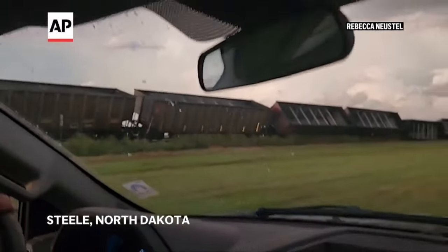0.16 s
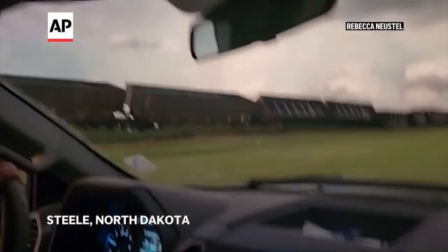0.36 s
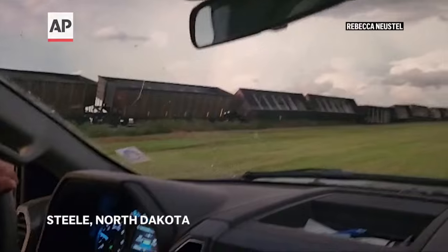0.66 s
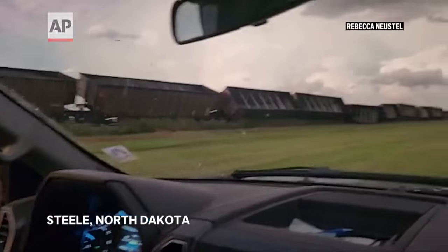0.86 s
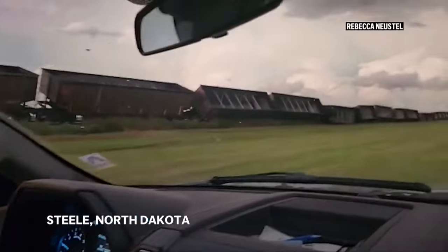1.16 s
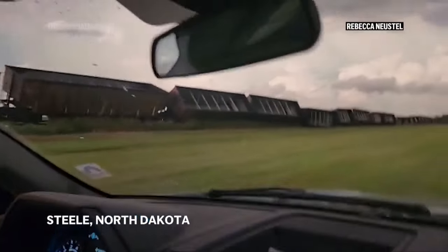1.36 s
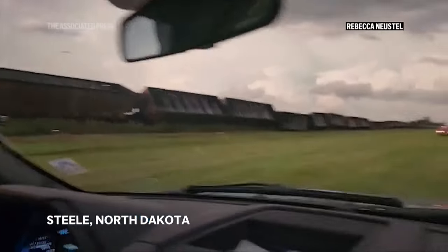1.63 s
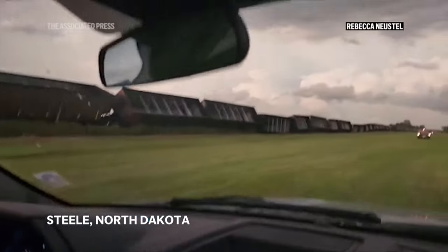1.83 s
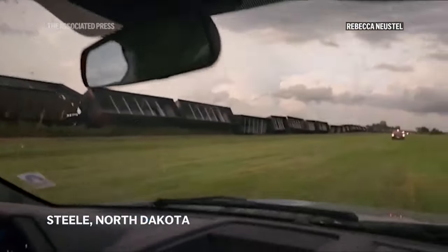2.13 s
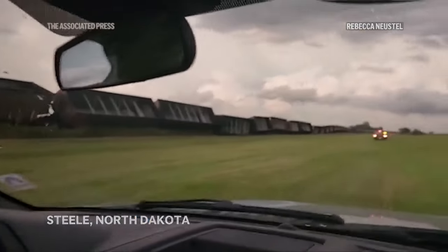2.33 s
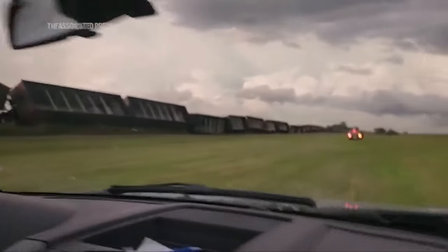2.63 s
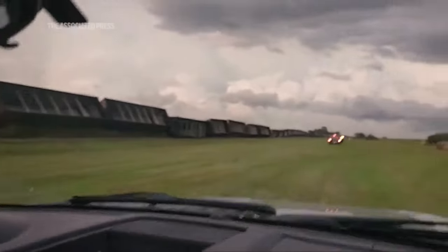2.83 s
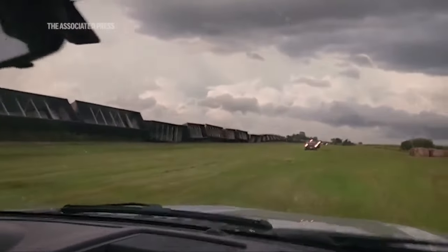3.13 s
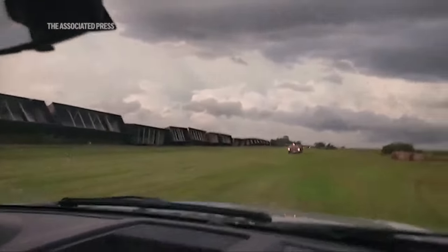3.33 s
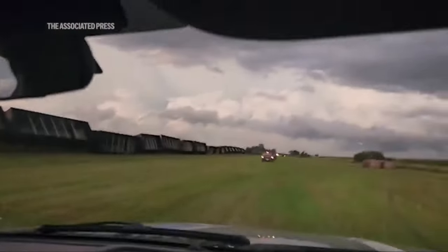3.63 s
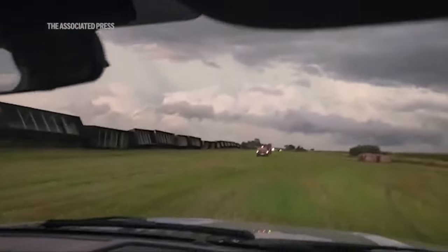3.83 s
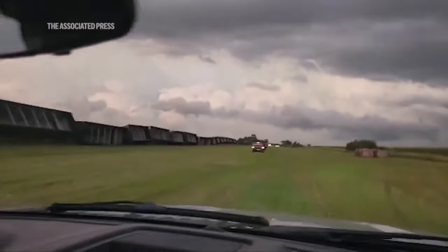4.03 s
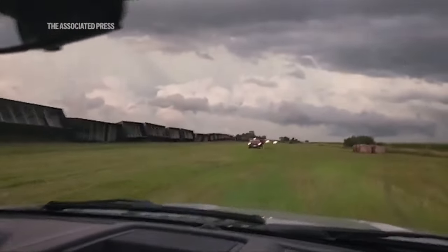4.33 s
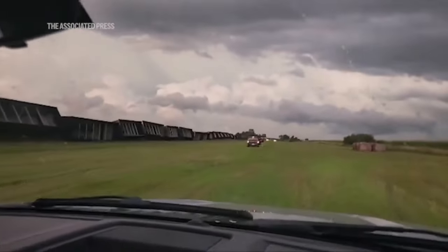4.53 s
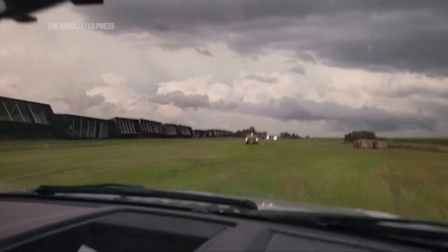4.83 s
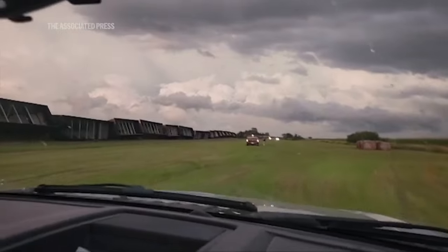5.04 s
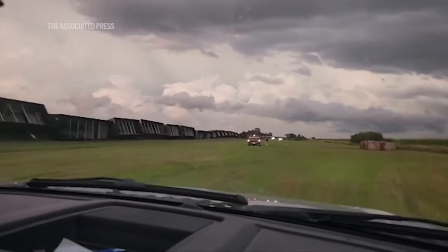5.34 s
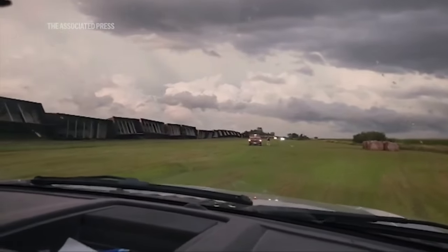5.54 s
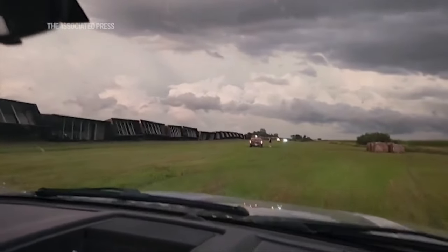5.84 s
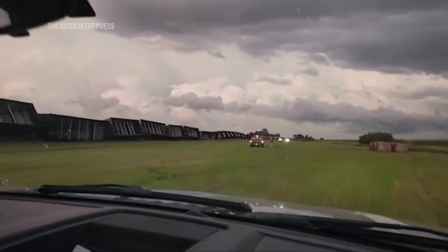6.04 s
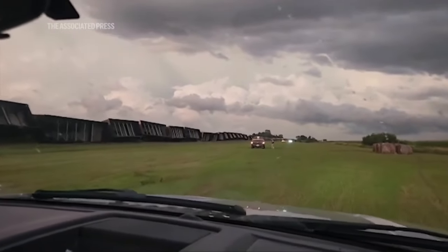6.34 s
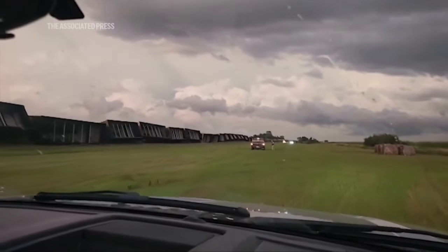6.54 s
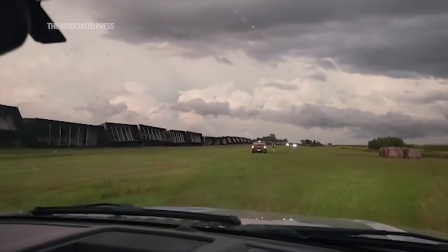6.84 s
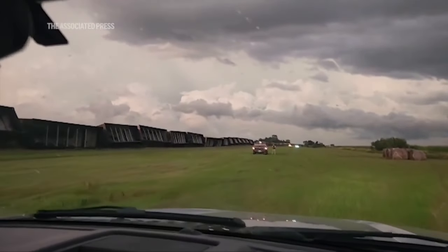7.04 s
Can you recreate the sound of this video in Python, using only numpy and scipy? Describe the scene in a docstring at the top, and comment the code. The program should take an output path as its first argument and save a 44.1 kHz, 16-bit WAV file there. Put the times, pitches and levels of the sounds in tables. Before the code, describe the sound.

Low V8 hum and shuddering rumble heard from the passenger seat, with muffled bumps, rattly clicks, brief creaks and faint grass hiss.

```python
"""Inside the cab of an eight-cylinder pickup that drives at a steady pace over a rough grass field.
The exhaust drones as a sum of cycle orders; shaped noise gives the ground rumble, tyre roar and grass hiss.
Jolts make the body shudder and the dashboard bump, clack and creak, as struck or juddering resonances.
A hand-held phone ticks in its case and slides over cloth, around most bumps, in strokes of clumped noise."""
import sys
import numpy as np
from scipy import signal
from scipy.fft import rfft, irfft, next_fast_len
from scipy.io import wavfile
from scipy.ndimage import uniform_filter1d, map_coordinates

SR = 44100
rng = np.random.default_rng(int(sys.argv[2]) if len(sys.argv) > 2 else 0)


def dump(signal):
    """Clip the signal to [-1, 1] and save it as 16-bit WAV at the path in sys.argv[1]."""
    limited = np.clip(np.atleast_2d(signal).T, -1, 1)
    pcm = np.round(limited * 32767).astype(np.int16)
    wavfile.write(sys.argv[1], SR, pcm)


N = 317079

# resonances of the phone's case: (centre [Hz], width [Hz], level [dB])
CASE_MODES = [(3270, 316, -0.5), (3400, 45, 7.5), (3600, 110, -5), (4160, 230, 0), (4500, 1200, -9),
              (5340, 215, 3), (7440, 300, -13.5), (13500, 640, -27)]


def amp(db):
    """Decibels to gain."""
    return 10 ** (np.asarray(db) / 20)


def unit(x):
    """Scale to rms 1."""
    return x / np.sqrt(np.mean(x ** 2) + 1e-20)


def along(points, hz):
    """Read (frequency, value) points on a log frequency axis."""
    f, v = np.transpose(points)
    return np.interp(np.log(hz + 1), np.log(f), v)


def curves(rows):
    """One value per sample for each column after the time."""
    s, *cols = np.transpose(rows)
    return [np.interp(np.arange(N) / SR, s, c) for c in cols]


def wobble(rate, size=N):
    """A smooth random curve with `rate` knots a second."""
    knots = rng.standard_normal(int(size * rate / SR) + 4)
    return map_coordinates(knots, [np.arange(size) * rate / SR])


def filtered(x, response):
    """Filter x by a real or complex response of frequency."""
    size = x.shape[-1]
    m = next_fast_len(size + 8192)
    spectrum = rfft(x, m) * response(np.fft.rfftfreq(m, 1 / SR))
    return irfft(spectrum, m)[..., :size]


def hump(hz, centre_hz, octaves, height_db):
    """Gain of a smooth boost or cut around one frequency."""
    distance = np.log2((hz + 1) / centre_hz) / octaves
    return amp(height_db * np.exp(-.5 * distance ** 2))


def body(modes, hz, tilt_db=0):
    """Causal response of resonances with alternating sign, tilted in dB per octave."""
    total = 0
    for k, (centre, width, db) in enumerate(modes):
        gain = (-1) ** k * amp(db + tilt_db * np.log2(centre))
        total = total + gain * 1j * hz * width / (centre ** 2 - hz ** 2 + 1j * hz * width)
    return total


def in_cab(pair, response):
    """Two unrelated signals become left and right: alike in the bass, diffuse and leaning in the treble."""
    # likeness of left and right: (frequency [Hz], correlation [-1 to 1])
    alike = [(30, 0.95), (80, 1), (160, 0.9), (300, 0.82), (600, 0.69), (1200, 0), (4000, 0)]
    # treble balance, mostly brighter on the right: (frequency [Hz], left minus right [dB])
    lean = [(3200, 0), (4400, -1.5), (5400, -6.5), (6400, -5), (8500, 0.5), (12500, -4.5)]

    def mid_side(hz):
        turn = np.arccos(np.clip(along(alike, hz), -1, 1)) / 2
        return response(hz) * np.array([np.cos(turn), np.sin(turn)])

    mid, side = filtered(pair, mid_side)
    left_right = np.array([mid + side, mid - side])
    return filtered(left_right, lambda hz: amp(along(lean, hz) * np.array([[.5], [-.5]])))


def patchy(depth_db):
    """Two noises in which patches of a few hundred Hz swell and fade for some 30 ms."""
    z = signal.stft(rng.standard_normal((2, N)), nperseg=512)[2]
    field = rng.standard_normal(z.shape[1:])
    field = uniform_filter1d(field, size=4, axis=0)  # smooth over frequency
    field = uniform_filter1d(field, size=6, axis=1)  # smooth over time
    return signal.istft(z * amp(depth_db * unit(field)), nperseg=512)[1][:, :N]


def rush(spectrum, patch_db, grain_db, grain_rate):
    """Stereo noise of rms 1 whose strength flutters in grains."""
    grains = patchy(patch_db) * amp(grain_db * wobble(grain_rate))
    return unit(in_cab(grains, lambda hz: amp(along(spectrum, hz))))


def add(out, s, sound, pan_db):
    """Mix a stereo sound in at time s, leaning left (+) or right (-) at constant power."""
    part = out[:, round(s * SR):][:, :sound.shape[1]]
    sides = unit(amp([[pan_db / 2], [-pan_db / 2]]))
    part += (sides * sound)[:, :part.shape[1]]


def ring(force, modes, length, tilt_db):
    """A body rung by a force; its energy is that of rms 1 held for `length` seconds."""
    sound = in_cab(force, lambda hz: body(modes, hz, tilt_db))
    return unit(sound) * np.sqrt(length * SR / sound.shape[1])


def engine():
    """Eight uneven firings a cycle: the firing line booms in the cab, weaker cycle orders throb around it."""
    # drone that follows the throttle: (time [s], firing rate [Hz], level [dB])
    throttle = [(0, 76.9, -17), (.15, 77.73, -29.5), (.33, 76.98, -19), (.72, 76.04, -25.5),
                (1.05, 73.62, -21), (1.3, 75.94, -23), (1.8, 78.55, -21.5), (2.3, 77.43, -19),
                (2.7, 74.8, -22.5), (3.1, 75.6, -21.5), (3.3, 74.68, -22), (4.05, 77.48, -20),
                (4.55, 76.57, -21.5), (5.1, 73.7, -20), (5.48, 76.54, -22), (6.38, 72.29, -22.5),
                (6.68, 73, -23.5), (6.95, 73.38, -20.5), (7.19, 72.9, -21.5)]
    # partials of the drone: (multiple of the eight-cylinder cycle rate, level within the drone [dB])
    exhaust = [(3, -15), (5, -9.5), (7, -23.5), (8, -0.5), (11, -24), (13, -22.5), (15, -34), (16, -24.5),
               (19, -36.5), (24, -33), (26, -35.5), (28, -31), (29, -35.5), (30, -36.5), (32, -32)]
    firing_hz, db = curves(throttle)
    cycle = 2 * np.pi * np.cumsum(firing_hz) / SR / 8
    drone = np.zeros(N)
    for order, order_db in exhaust:
        unsteady = .02 if order_db > -3 else .12  # the firing line is the steadiest
        strength = amp(order_db) * (1 + unsteady * wobble(7.8))
        phase = rng.uniform(0, 2 * np.pi) + unsteady * wobble(8.1)
        drone += strength * np.sin(order * cycle + phase)
    return np.sqrt(2) * amp(db) * drone


def ground():
    """Rough ground shakes the body and the tyres roar evenly on the turf."""
    # rougher and smoother stretches: (time [s], body shake level [dB])
    stretches = [(0, -22.5), (2.7, -22.5), (3.7, -24), (5.1, -22.5), (6.2, -23), (7.19, -23.5)]
    # colour of the body shake: (frequency [Hz], relative level per Hz [dB])
    shake_colour = [(10, -22.5), (19, 0), (27, 1.5), (36, 0.5), (50, 3.5), (63, 2.5), (76, -4.5),
                    (90, -3.5), (115, -6.5), (145, -15), (190, -27), (300, -95)]
    # colour of the tyre roar: (frequency [Hz], relative level per Hz [dB])
    roar_colour = [(110, -33), (170, -4), (205, -4), (240, -2.5), (280, 1), (335, -4.5), (450, -10.5),
                   (600, -15.5), (760, -15.5), (950, -22), (1500, -29), (3000, -66)]
    roar_db = -41.5
    shake_db, = curves(stretches)
    shake = amp(shake_db) * rush(shake_colour, patch_db=0.0, grain_db=2.0, grain_rate=13)
    roar = amp(roar_db) * rush(roar_colour, patch_db=1.0, grain_db=1.0, grain_rate=44)
    return shake + roar


def ruts():
    """A wheel drops into a rut and the whole body shudders for a few cycles."""
    # deep ruts: (time [s], peak level [dB])
    drops = [(0.269, -15.5), (1.158, -15), (2.179, -11), (5.721, -15.5)]
    shudder_hz, swell_s = 37.8, 0.082  # pitch, time to the strongest moment
    out, t = np.zeros((2, N)), np.arange(SR // 2) / SR
    u = (t / swell_s) ** 2
    shudder = u * np.exp(1 - u) * np.sin(2 * np.pi * shudder_hz * t)
    for s, db in drops:
        add(out, s, amp(db) * np.array([shudder, shudder]), 0)
    return out


def bumps():
    """One soft blow rings the padded panel for a few cycles; its higher modes differ from side to side."""
    # soft bumps: (time [s], level [dB], pitch of the lowest mode [Hz], hardness [dB per octave])
    blows = [(.122, -23, 298, -2), (2.401, -29, 315, -1), (2.623, -32.5, 292, -0.5),
             (2.7648, -21.5, 290, -1.5), (2.998, -25, 322.6, 2), (5.002, -22, 286, -2),
             (5.401, -24.5, 284, 1), (5.792, -25, 285, 0.5), (6.281, -27, 293, 0.5),
             (6.7158, -23.5, 291, 1), (7.17, -24, 339, 0)]
    # modes of the padded panel: (multiple of the lowest mode, level [dB], t60 [s])
    panel = [(1, 1, 0.063), (1.45, -7, 0.034), (1.93, -1, 0.037), (2.6, -11.5, .022), (3.58, -10, 0.04),
             (4.4, -15, 0.024), (5.5, -17, 0.031), (7.55, -19, 0.038)]
    out, t = np.zeros((2, N)), np.arange(SR // 6) / SR
    rise = 1 - np.exp(-(t / .0022) ** 2)  # the padding gives way
    for s, db, pitch_hz, hardness_db in blows:
        thud = np.zeros((2, len(t)))
        for multiple, mode_db, t60 in panel:
            octaves = np.log2(multiple)
            phase = rng.uniform(0, 2 * np.pi) + 0.38 * octaves * rng.standard_normal((2, 1))
            decay = amp(mode_db + hardness_db * octaves - 60 * t / t60)
            thud += decay * np.sin(2 * np.pi * pitch_hz * multiple * t + phase)
        add(out, s, amp(db) * thud * rise, 0)
    return out


def clacks():
    """Hard plastic contacts, short noise bursts with dense cab reflections, ring as dry clacks."""
    # clacks: (time [s], level [dB], left minus right [dB], tilt [dB per octave])
    contacts = [(.058, -37.5, 1.5, 21), (.55, -31, -5, -15), (0.852, -21.5, 12, 1.5),
                (2.99, -39.5, -0.5, 16.5), (3.229, -37.5, -3.5, 22), (4.191, -37.5, 13, 1),
                (6.825, -22.5, 16, -4), (6.867, -34, -6.5, 6.5)]
    # resonances of the plastic: (centre [Hz], width [Hz], level [dB])
    plastic = [(900, 300, -4), (1640, 670, 4), (2120, 620, 7), (3550, 1010, 2.5), (5240, 1600, -2),
               (12500, 3000, -46.5)]
    contact_t60, cab_db, cab_t60 = .014, -23, .07
    out, t = np.zeros((2, N)), np.arange(SR // 6) / SR
    fade = amp(-60 * t / contact_t60) + amp(cab_db - 60 * t / cab_t60)
    for s, db, pan_db, tilt_db in contacts:
        force = rng.standard_normal((2, len(t))) * fade
        add(out, s, amp(db) * ring(force, plastic, length=0.0032, tilt_db=tilt_db), pan_db)
    return out


def squeaks(rows, modes, focus_db, cab_db, cab_t60):
    """Two plastic parts judder against each other for a moment and excite the modes nearest to the judder."""
    out, t = np.zeros((2, N)), np.arange(SR // 6) / SR
    for s, db, centre_hz, length, pan_db in rows:
        press = np.sqrt(np.clip(1 - (t / length) ** 2, 0, 1))
        press += amp(cab_db - 60 * t / cab_t60)  # reflections in the cab
        noise = rng.standard_normal((2, len(t)))
        judder = filtered(noise, lambda hz: hump(hz, centre_hz, octaves=0.16, height_db=focus_db))
        add(out, s, amp(db) * ring(press * judder, modes, length, 0), pan_db)
    return out


def creaks():
    """Juddering trim rings the dashboard."""
    # creaks: (time [s], level [dB], centre of the judder [Hz], length [s])
    judders = [(.294, -35, 1150, .016), (0.342, -37, 1030, .012), (.358, -36, 1287, 0.0082),
               (0.369, -33.5, 1500, 0.012), (2.998, -37, 1250, 0.012), (7.169, -24, 1270, 0.009)]
    # resonances of the dashboard: (centre [Hz], width [Hz], level [dB])
    dash = [(724, 140, 0.5), (1030, 87, 1.5), (1287, 33, -0.5), (1500, 45, 5), (2170, 380, -9.5),
            (3420, 720, -18.5)]
    rows = [(*row, -1) for row in judders]  # every creak leans 1 dB right
    return squeaks(rows, dash, focus_db=13.5, cab_db=-11.5, cab_t60=0.15)


def ticks():
    """The phone ticks in its case: brief judders ring the case's modes."""
    # ticks: (time [s], level [dB], centre of the judder [Hz], length [s], left minus right [dB])
    judders = [(.058, -30, 3600, 0.0097, -5), (.491, -21.5, 4920, 0.01, -2.5), (.738, -36, 3500, 0.011, 1),
               (1.143, -33.5, 4700, .009, -2), (1.184, -36, 3780, 0.0081, -1), (1.545, -44, 3360, .011, 5),
               (1.594, -41.5, 3150, 0.022, 1), (2.873, -42.5, 4300, .009, -6),
               (2.906, -40, 5400, 0.008, -6), (3.089, -38, 5500, 0.0076, -4.5),
               (3.125, -39, 4700, 0.012, -3), (3.163, -39.5, 4500, 0.0057, -6),
               (3.204, -48, 4500, 0.0065, -4.5), (3.511, -41, 4900, 0.011, -2), (4.4, -41, 5500, .011, -5),
               (4.552, -35, 3220, .011, 2), (5.113, -44, 4706, 0.0099, -1), (5.47, -40.5, 5100, 0.01, -4),
               (6.176, -38, 4225, 0.0061, 0), (6.35, -38, 4540, 0.012, -5), (6.686, -24, 4630, .012, -5),
               (6.938, -25.5, 3270, 0.0069, -4.5), (6.945, -24.5, 3200, 0.017, 1.5),
               (6.96, -32, 3360, 0.021, -3), (6.975, -32, 3770, 0.016, -4)]
    return squeaks(judders, CASE_MODES, focus_db=11, cab_db=-9.5, cab_t60=0.15)


def rustles():
    """Each rub is a stroke of tiny fibre slips that come in clumps and ring the phone's case a little."""
    # cloth rubs: (time [s], length [s], level [dB], left minus right [dB],
    # centre of the scratch [Hz], fall from start to end [dB])
    rubs = [(0.115, .1, -35, -3.5, 3480, 5), (0.245, 0.019, -43, -3.5, 3600, 3),
            (0.293, 0.014, -36, -2, 3220, 4), (0.325, 0.053, -40, -5.5, 3330, 4),
            (0.565, .12, -44.5, 5, 7500, 6), (0.598, 0.058, -42, -2, 2570, 8),
            (0.743, 0.11, -34, 8, 9000, 0), (2.035, 0.09, -46.5, -1.5, 3870, -.5),
            (2.463, .052, -49, -2.5, 3939, 2.5), (2.762, 0.075, -32.5, -4, 5340, 1),
            (2.852, .075, -44, -2.5, 5400, 2.5), (2.952, 0.48, -45, -7.5, 1778, 7.5),
            (3.072, 0.092, -46.5, -1.5, 4800, 1), (3.424, 0.12, -48.5, -2, 4150, 1),
            (3.666, .021, -28, 21, 1110, 2.5), (3.688, 0.074, -35, 17.5, 505, .5),
            (3.742, .036, -33, 11.5, 800, -3.5), (4.188, .011, -38, 9.5, 600, 3),
            (5.003, 0.062, -36.5, 0, 4302, 7.5), (5.107, .026, -44.5, -3, 2002, 3.5),
            (5.398, 0.094, -38.5, 0, 3900, 6), (5.784, 0.12, -40, -2, 3700, 5),
            (6.271, 0.1, -39, 0.5, 3940, 5), (6.706, 0.13, -37.5, -1, 3869, 7.5)]
    # colour of the cloth: (frequency [Hz], relative level per Hz [dB])
    cloth = [(250, 6), (700, -3.5), (1100, -2), (2300, 0.5), (3400, -3), (4600, -1), (5500, 0),
             (6400, -5.5), (7700, -10.5), (9500, -32), (12800, -21), (15000, -35.5)]
    grain_db, clump_db, roundness = 1.9, 1.8, .42
    case_share_db, cab_t60 = -9.5, .05
    out, t = np.zeros((2, N)), np.arange(SR // 2) / SR
    slips = patchy(depth_db=3.0) * amp(grain_db * wobble(900) + clump_db * wobble(130))
    keep = amp(-120 / (cab_t60 * SR))  # power kept per sample: the cab holds each stroke for a moment
    for s, length, db, pan_db, centre_hz, sag_db in rubs:
        force = slips[:, round(s * SR):][:, :len(t)]
        rub = in_cab(force, lambda hz: amp(along(cloth, hz)) * hump(hz, centre_hz, octaves=0.56, height_db=8.5))
        case = filtered(force[::-1],
                        lambda hz: body(CASE_MODES, hz) * hump(hz, centre_hz, octaves=.4, height_db=8))
        u = np.clip(t[:rub.shape[1]] / length, 0, 1)
        stroke = (4 * u * (1 - u)) ** roundness * amp(sag_db * (.5 - u))
        stroke = np.sqrt(signal.lfilter([1 - keep], [1, -keep], stroke ** 2))
        mix = unit(unit(rub) + amp(case_share_db) * unit(case))
        add(out, s, amp(db) * stroke * mix, pan_db)
    return out


def grass():
    """Grass sweeps along underneath; the shaking keeps the phone's case faintly ringing in the hand."""
    # sweep of the grass: (time [s], hiss level [dB])
    sweep = [(0, -51), (.5, -45.5), (1, -54.5), (1.55, -48), (1.85, -54), (2.62, -54), (2.77, -44.5),
             (3.6, -55), (3.85, -49.5), (4.4, -46.5), (5.3, -49.5), (5.62, -48.5), (6.1, -51), (7.19, -47)]
    # colour of the hiss: (frequency [Hz], relative level per Hz [dB])
    hiss_colour = [(400, -18.5), (900, -0.5), (1500, 4.5), (2700, 3), (3400, 1.5), (4600, 0.5), (5500, 2.5),
                   (6400, -3), (7600, -4.5), (9500, -24), (12800, -18), (15000, -28)]
    grass_db, = curves(sweep)
    hiss = rush(hiss_colour, patch_db=2.0, grain_db=1.5, grain_rate=640)
    hiss = amp(grass_db + 1.1 * wobble(14)) * hiss
    grip = unit(in_cab(rng.standard_normal((2, N)), lambda hz: body(CASE_MODES, hz)))
    grip = amp(grass_db - 12.0 + 2.4 * wobble(25)) * grip
    return hiss + grip * amp([[-2], [1]])  # the ringing leans right


def walls(x):
    """Dense reflections from glass and trim give a steady sound a fine, fixed ripple of colour."""
    wet_db, wet_t60 = -8, .07
    t = np.arange(SR // 12) / SR
    echo = rng.standard_normal(len(t)) * amp(-60 * t / wet_t60)
    wet = signal.fftconvolve(x, echo[None] / np.linalg.norm(echo), axes=1)[:, :N]
    return (x + amp(wet_db) * wet) / np.hypot(1, amp(wet_db))


def dull_start(x):
    """The upper treble is dull for the first moment, then opens."""
    until_s, opening_s = 0.43, .03
    dull = filtered(x, lambda hz: hump(hz, 6100, octaves=0.17, height_db=-11.5))
    opened = np.clip((np.arange(N) / SR - until_s) / opening_s, 0, 1)
    return dull + (x - dull) * opened


def scene():
    """Everything as heard from the passenger seat."""
    driving = engine() + ground() + ruts()
    dashboard = bumps() + clacks() + creaks()
    hiss_and_cloth = dull_start(walls(grass() + rustles()))
    return driving + dashboard + ticks() + hiss_and_cloth


def record(dry):
    """The phone keeps nothing above its band limit of 15 kHz."""
    return filtered(dry, lambda hz: hz < 15000)


dry = scene()
out = record(dry)
dump(out)
```